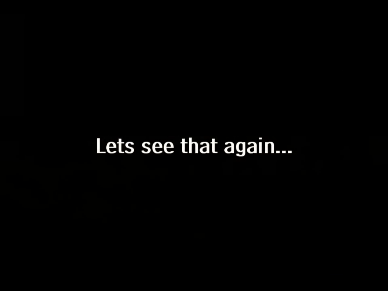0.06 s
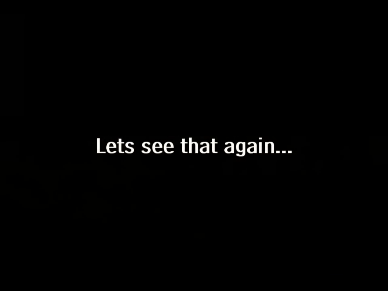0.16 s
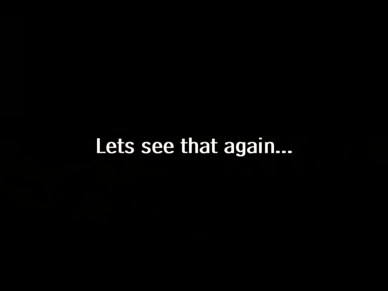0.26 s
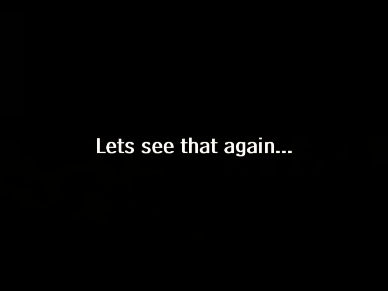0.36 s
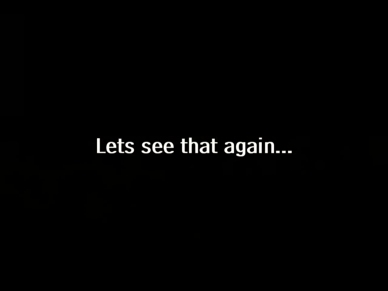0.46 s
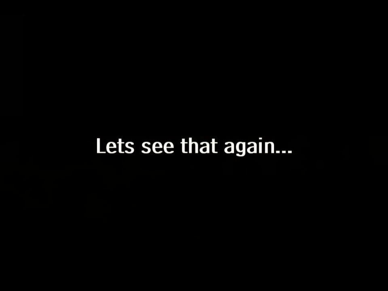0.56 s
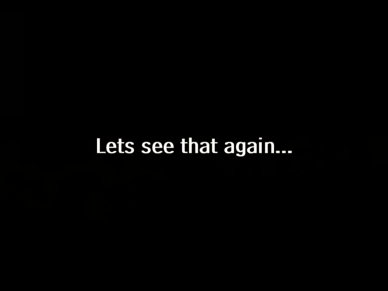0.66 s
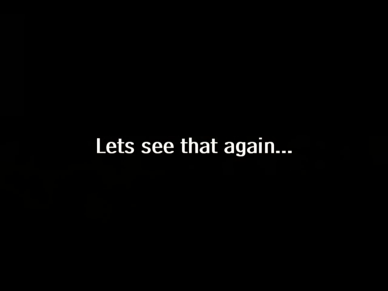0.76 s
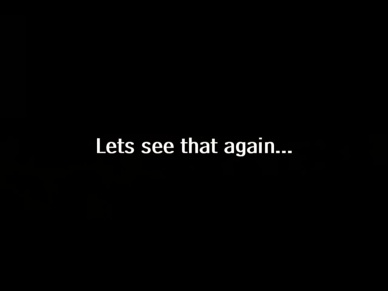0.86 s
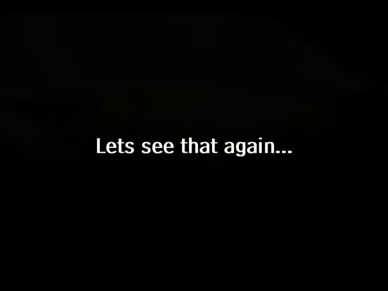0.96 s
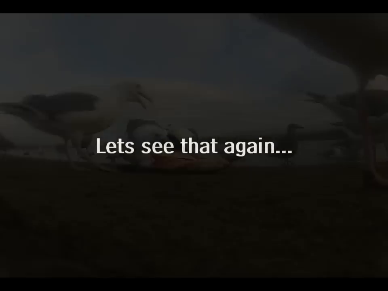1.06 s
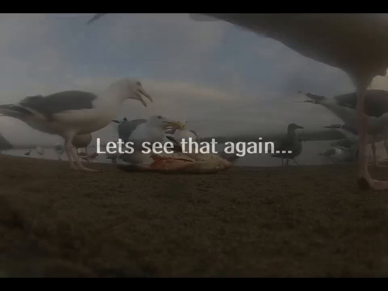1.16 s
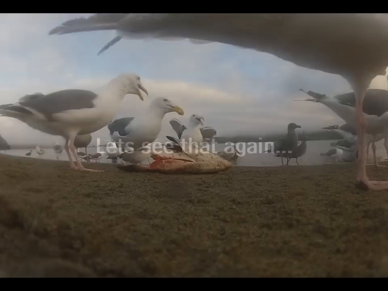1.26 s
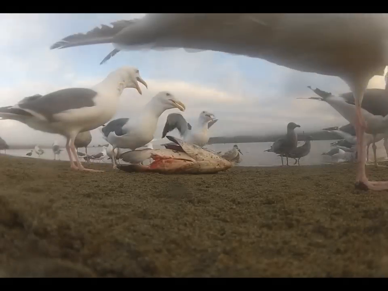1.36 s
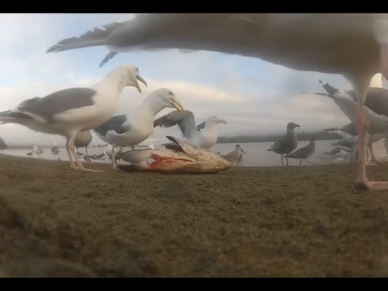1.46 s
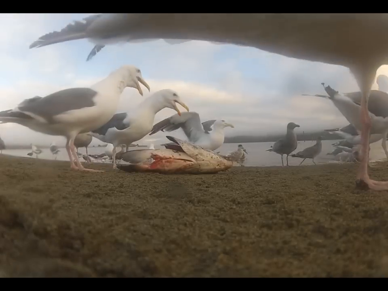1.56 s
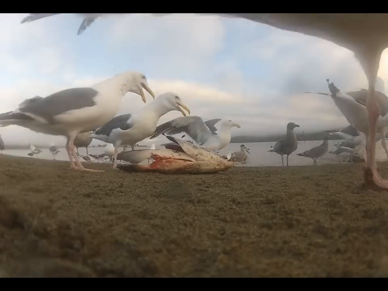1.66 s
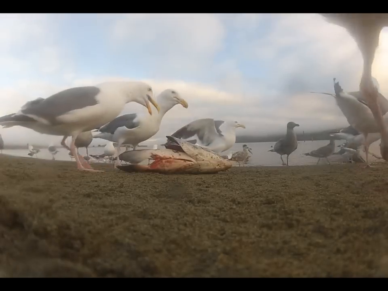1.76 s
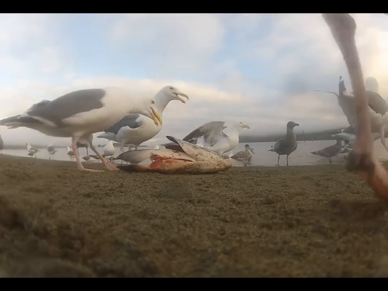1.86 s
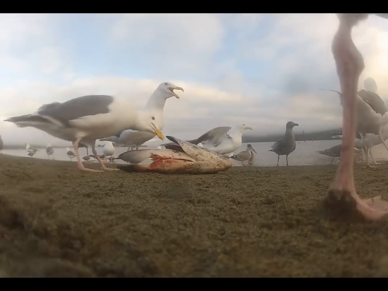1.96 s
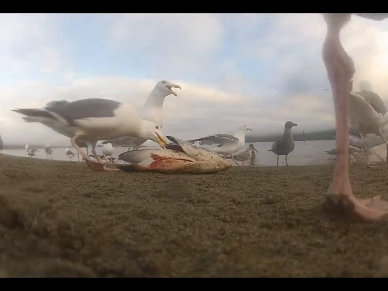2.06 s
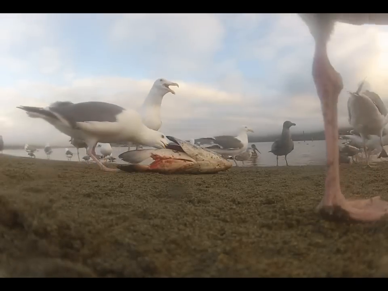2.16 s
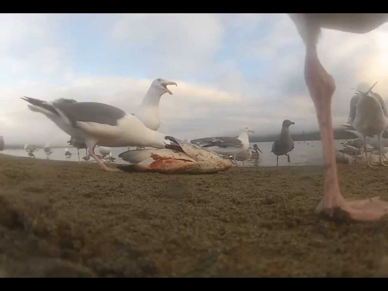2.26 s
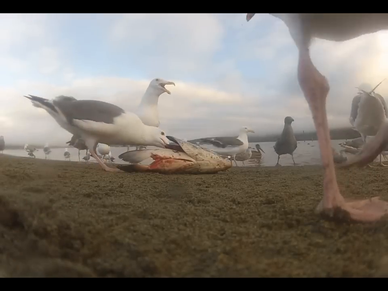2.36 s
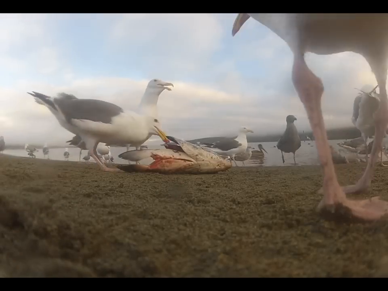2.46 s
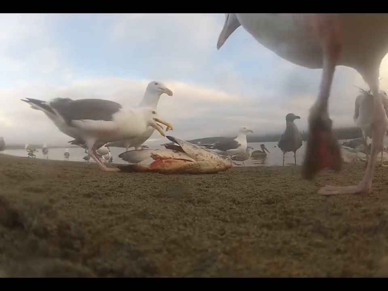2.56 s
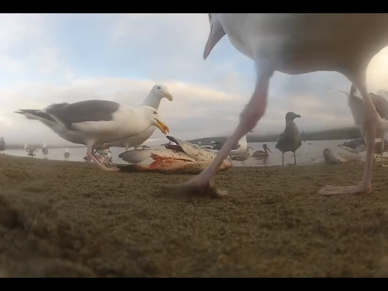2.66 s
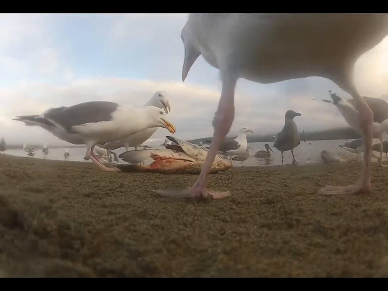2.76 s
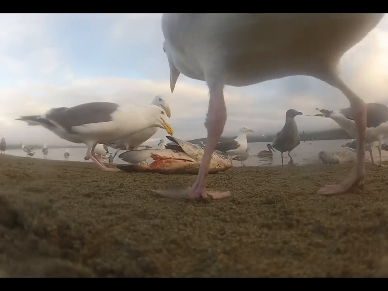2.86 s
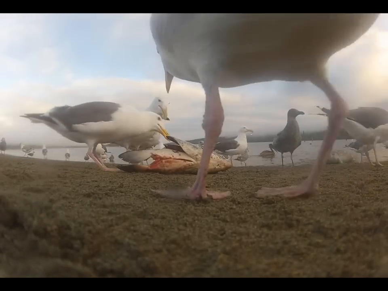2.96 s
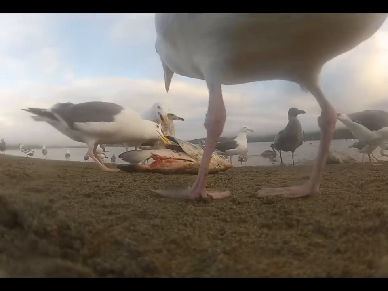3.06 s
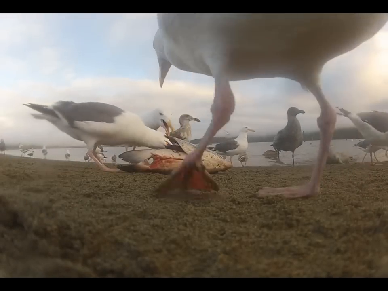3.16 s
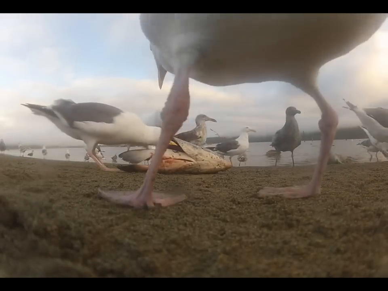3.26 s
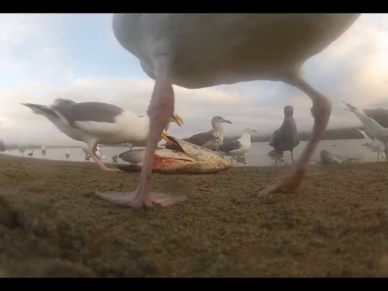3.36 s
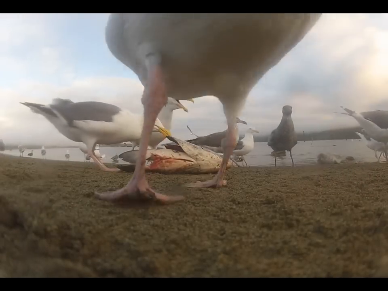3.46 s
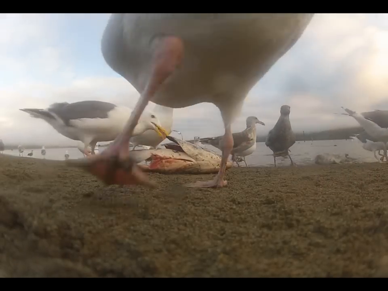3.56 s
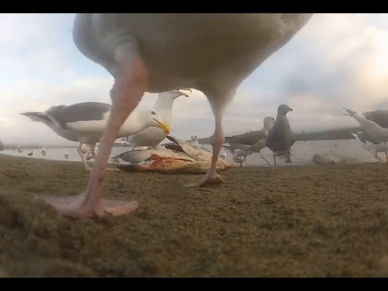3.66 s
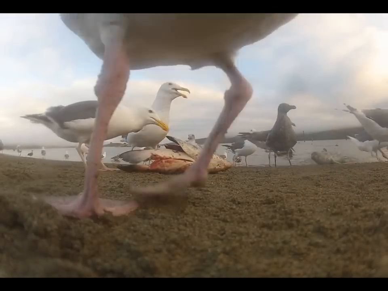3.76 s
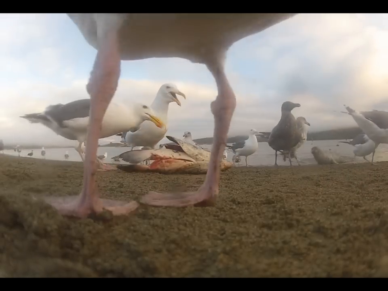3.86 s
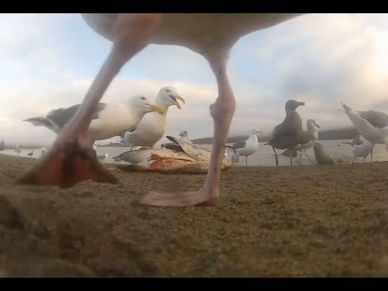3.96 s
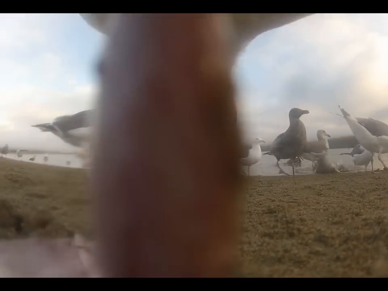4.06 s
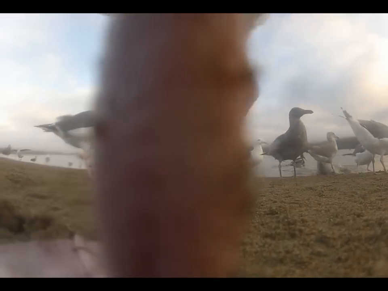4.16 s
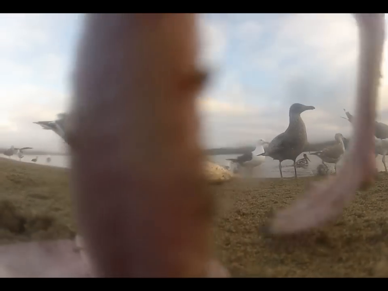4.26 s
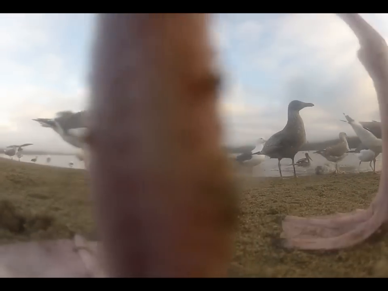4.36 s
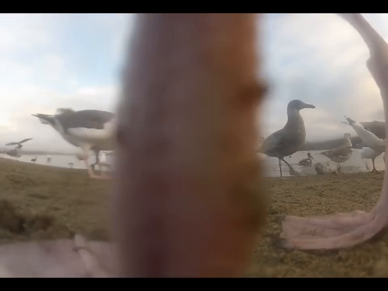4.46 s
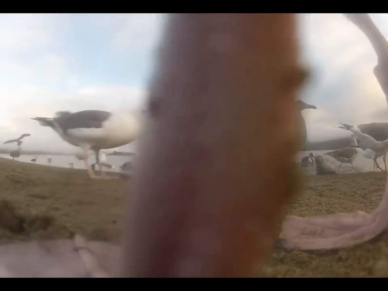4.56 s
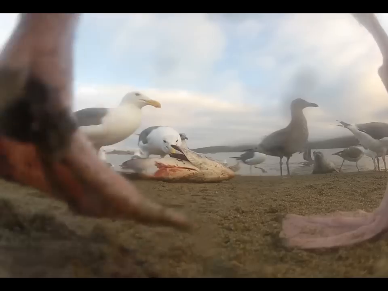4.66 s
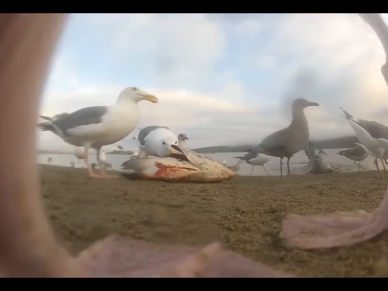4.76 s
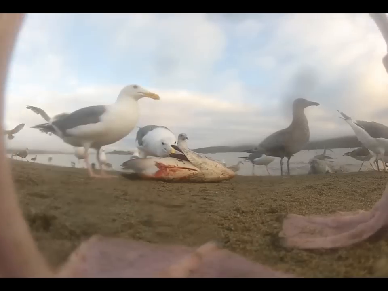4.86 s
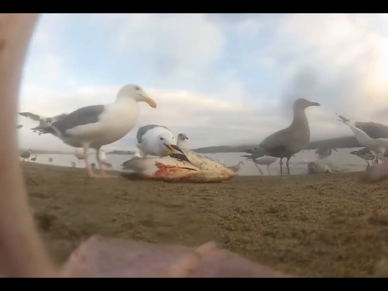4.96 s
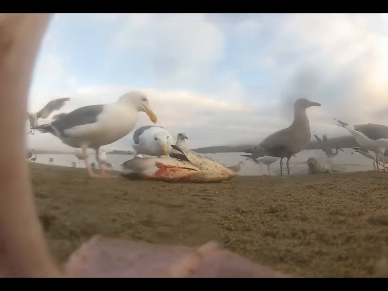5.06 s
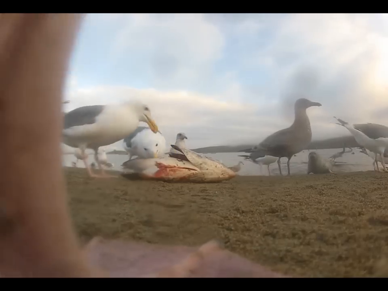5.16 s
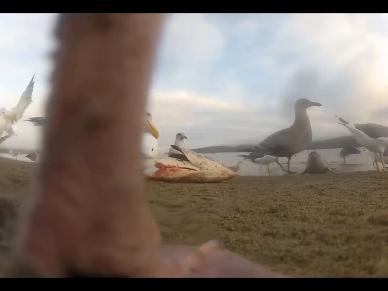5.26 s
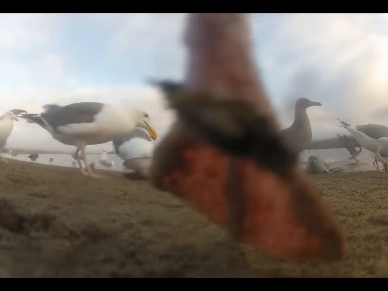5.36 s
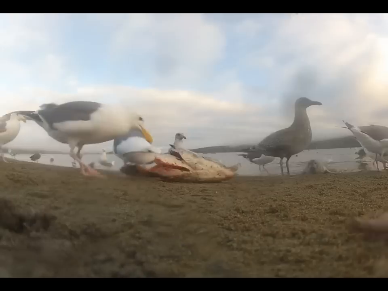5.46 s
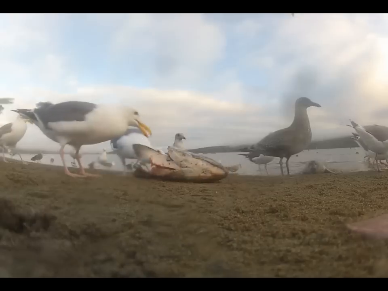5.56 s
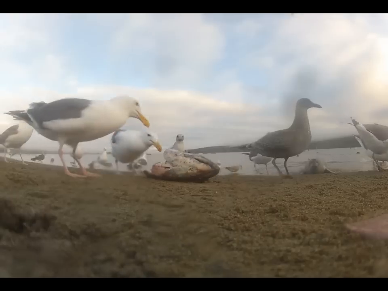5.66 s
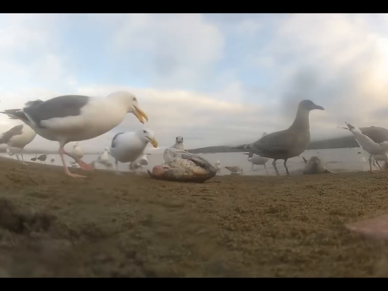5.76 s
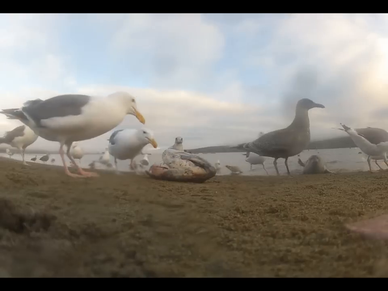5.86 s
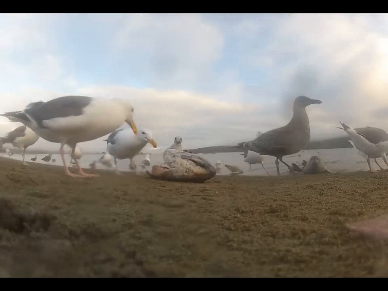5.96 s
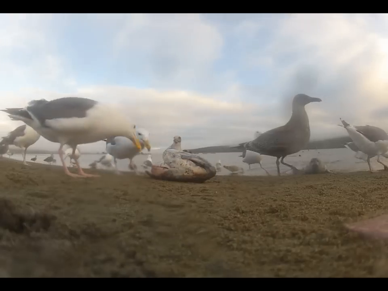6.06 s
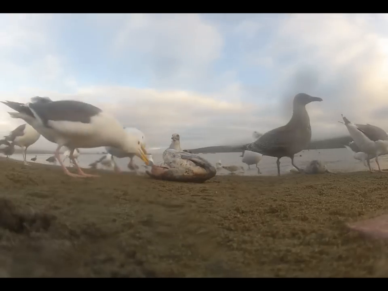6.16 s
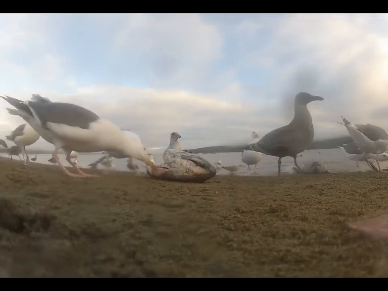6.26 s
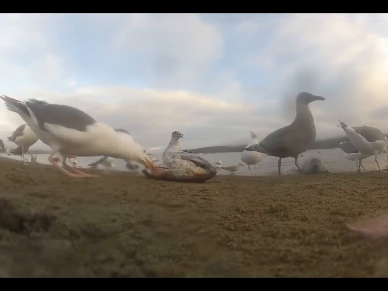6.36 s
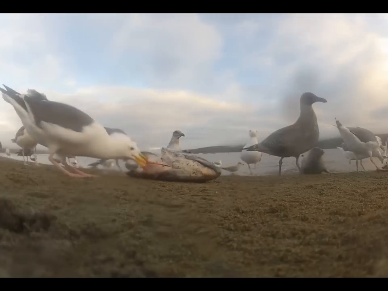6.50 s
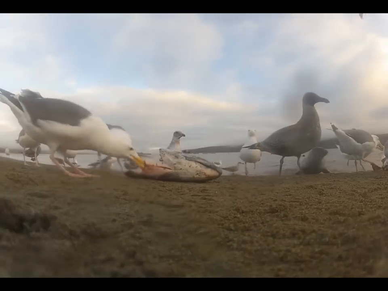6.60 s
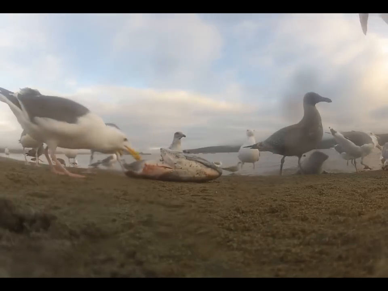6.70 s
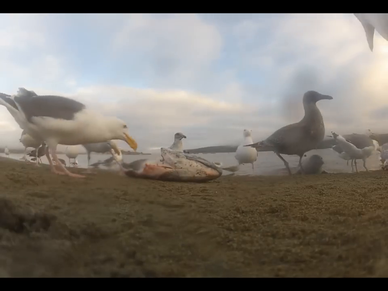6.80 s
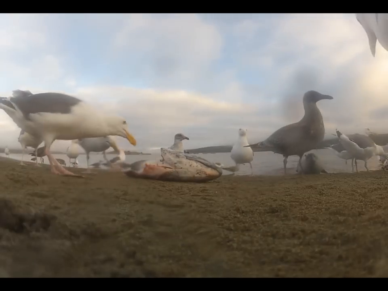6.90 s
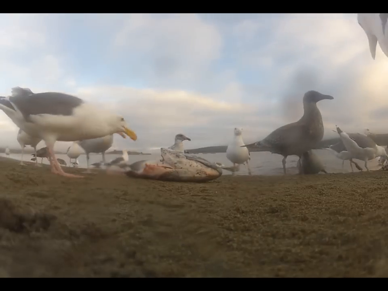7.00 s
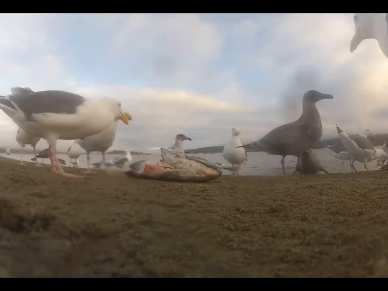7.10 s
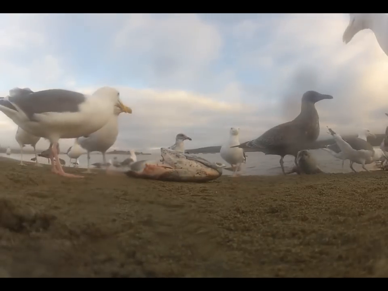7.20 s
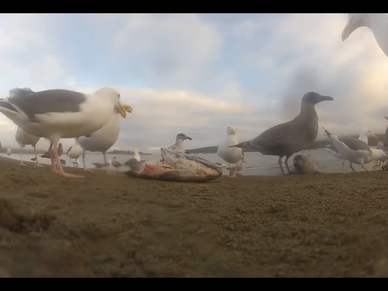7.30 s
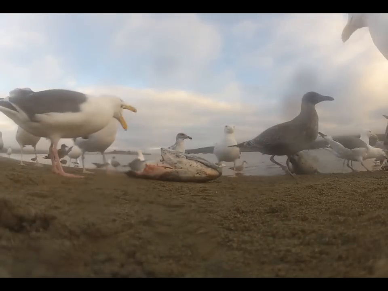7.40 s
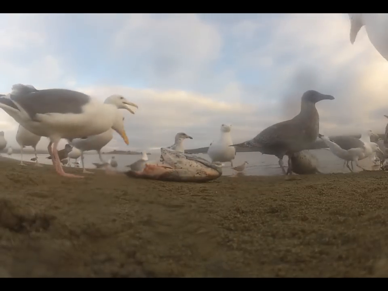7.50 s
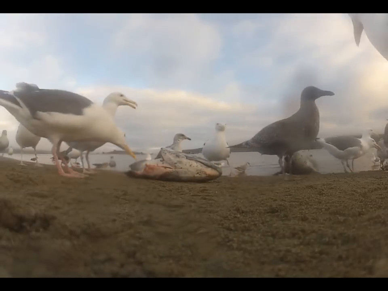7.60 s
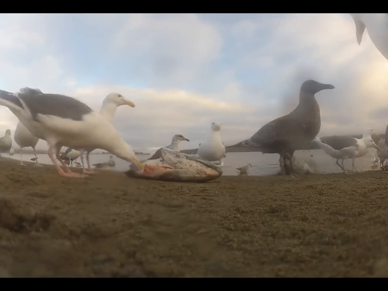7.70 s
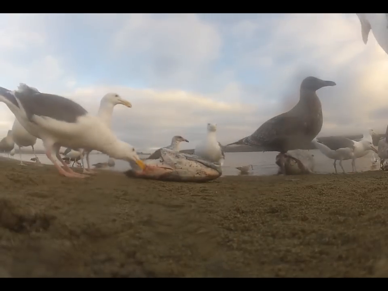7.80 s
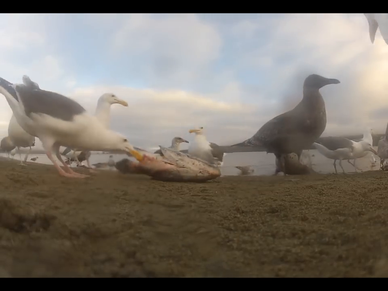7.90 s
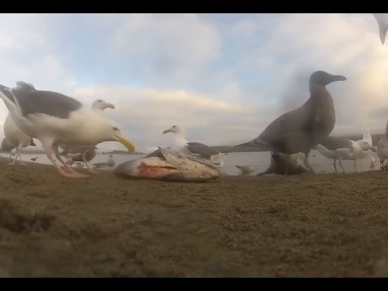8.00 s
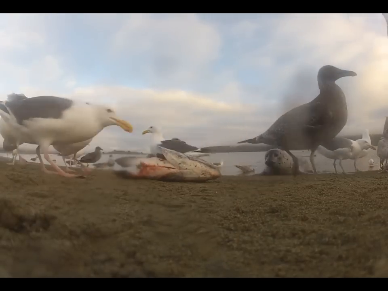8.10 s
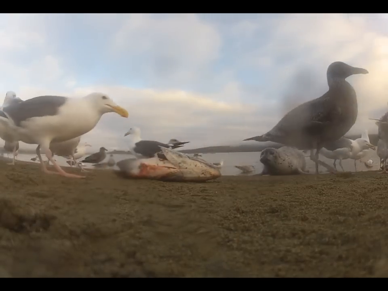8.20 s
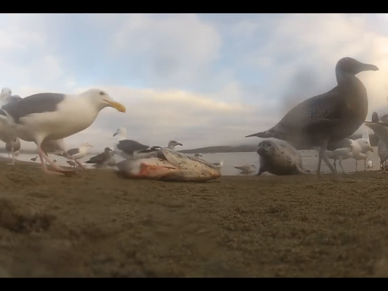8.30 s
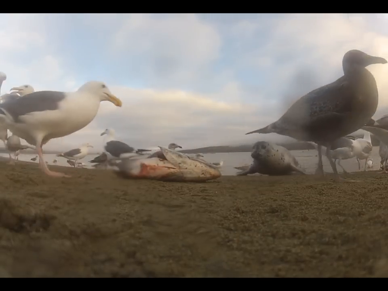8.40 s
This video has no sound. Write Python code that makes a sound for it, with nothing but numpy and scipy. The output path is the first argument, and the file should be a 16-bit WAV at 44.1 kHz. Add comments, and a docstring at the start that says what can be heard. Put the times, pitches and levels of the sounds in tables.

```python
"""Gulls squabble on a beach: adults cry arched notes, built from harmonics, that croak, break clear and rasp.
A young bird whistles in steps of near-sine tone, and one bird cackles in bursts of throat pulses.
A foot knocks, ticks and scrapes the plastic housing of a small camera on the sand; surf and wind are noise.
Slow playback holds every sample, which mirrors the sound around the sample rate."""
import sys
import numpy as np
from scipy import signal
from scipy.fft import rfft, irfft
from scipy.io import wavfile
from scipy.ndimage import uniform_filter1d

SR = 44100
rng = np.random.default_rng(int(sys.argv[2]) if len(sys.argv) > 2 else 0)


def store_pcm(level_fs):
    """Save levels as 16-bit WAV."""
    pcm = np.round(np.clip(level_fs, -1, 1) * 32767).astype(np.int16)
    wavfile.write(sys.argv[1], SR, np.atleast_2d(pcm).T)


def boost(x):
    """Linear amplitude factor 10**(x/20) for a level x in decibels (scalar or array-like)."""
    u = np.asarray(x, float) / 20
    return 10 ** u


N = 372204

# Arched cries of the adults. Each row: top of the arch in seconds, top pitch in Hz, rise in seconds,
# fall in seconds, fundamental in dB and second harmonic in dB, both before the voice shades them.
CRIES = [(0.0, 1500, .05, .062, -36, -36), (.08, 1343, 0.069, 0.059, -31.5, -28),
         (0.312, 1437, .13, 0.076, -35, -36), (0.397, 1326, 0.082, 0.054, -30, -32.5),
         (0.646, 1471, 0.12, 0.073, -32, -36), (0.732, 1335, 0.089, 0.041, -26.5, -25),
         (1.0, 1526, 0.11, 0.097, -30.5, -37.5), (1.046, 1320, 0.073, 0.076, -32, -26.5),
         (1.28, 1180, 0.098, 0.03, -30, -43), (1.312, 1449, 0.068, 0.054, -40, -27),
         (1.375, 1330, 0.12, 0.064, -34.5, -37), (1.386, 1473, 0.085, 0.061, -34, -25),
         (1.744, 1431, 0.12, 0.073, -26.5, -26), (2.031, 1276, 0.054, 0.048, -28, -28.5),
         (2.075, 1290, 0.1, 0.078, -34, -47), (2.35, 1232, 0.046, 0.042, -32, -36),
         (2.391, 1369, 0.094, 0.043, -29.5, -47), (2.781, 1238, .078, 0.059, -28.5, -34.5),
         (3.166, 1248, 0.075, 0.07, -31, -31.5), (3.535, 1258, 0.064, .062, -27, -26.5),
         (3.89, 1293, 0.07, 0.063, -30, -25.5), (4.24, 1196, .055, 0.047, -28.5, -33),
         (4.62, 1160, 0.1, 0.039, -32.5, -44), (4.985, 1246, 0.083, 0.041, -29.5, -40),
         (5.41, 836, .11, 0.1, -33, -44.5), (5.599, 1165, .06, .045, -34, -35.5),
         (6.235, 1050, 0.08, 0.046, -37, -45), (6.55, 1090, .045, 0.045, -42, -28.5),
         (6.637, 1397, 0.085, 0.051, -55, -39), (6.84, 1173, 0.028, 0.089, -38.5, -43),
         (6.97, 1420, 0.094, 0.071, -63, -34.5), (7.0, 1283, 0.028, 0.11, -38, -39.5),
         (7.31, 1262, 0.068, 0.048, -40, -26), (7.33, 1423, 0.086, 0.059, -57, -33),
         (7.54, 1070, 0.079, 0.057, -37, -35), (7.622, 1295, 0.078, 0.052, -36.5, -22.5),
         (7.685, 1413, .1, 0.064, -52, -33.5), (7.966, 1270, 0.084, 0.066, -37.5, -26),
         (8.05, 1404, 0.082, 0.059, -58, -34.5), (8.33, 1199, 0.082, 0.076, -34.5, -29),
         (8.44, 1090, .08, 0.054, -41, -36.5)]
# Resonances of hoarse voices. Each row: centre in Hz, width in Hz, gain in dB.
HOARSE_MODES = [(1104, 260, 11.5), (1810, 83, 16.5), (2606, 810, 10.5), (3700, 470, -12), (5200, 2900, -62)]
# Resonances of the plastic housing. Each row: centre in Hz, width in Hz, gain in dB.
HOUSING_MODES = [(1180, 620, -9), (1870, 240, 0.5), (2390, 330, -1.5), (3710, 310, -4), (5160, 1160, -17.5)]


def coloured(points):
    """Unit-rms noise with the given spectrum, as (Hz, dB) points."""
    hz, db = np.transpose(points)
    f = np.fft.rfftfreq(N, 1 / SR) + 1
    spectrum = rfft(rng.standard_normal(N)) * boost(np.interp(np.log(f), np.log(hz), db))
    x = irfft(spectrum, N)
    return x / x.std()


def ring(x, modes):
    """Sum of two-pole resonances, neighbours in opposite sign."""
    total = 0
    for k, (hz, width, db) in enumerate(modes):
        b, a = signal.iirpeak(hz, hz / width, SR)
        total = total + (-1) ** k * boost(db) * signal.lfilter(b, a, x)
    return total


def walk(rate):
    """Random levels, each held 1 / rate seconds, then smoothed into slopes; unit spread."""
    hold = int(SR / rate)
    steps = np.repeat(rng.standard_normal(N // hold + 1), hold)
    x = uniform_filter1d(steps, hold)[:N]
    return x / x.std()


def blips(rows, width_s):
    """One short bell-shaped bump per (seconds, dB) row, peaking one width after the given time."""
    t = np.arange(N) / SR
    return sum(boost(db) * np.exp(-.5 * ((t - s - width_s) / width_s) ** 2) for s, db in rows)


def span(start, length, fade_s):
    """Samples of an event, its progress (0-1 between the fades) and its edge fades."""
    i = np.arange(max(int((start - fade_s) * SR), 0), min(int((start + length + fade_s) * SR), N))
    t = i / SR - start
    fade = np.clip(np.minimum(t, length - t) / fade_s + 1, 0, 1) ** 2
    return i, t / length, fade


def adults():
    """Harmonic notes that croak, break clear and flare as they fall; each drives a rasp ahead of it."""
    # Chest resonance that shades the fundamental. Each row: frequency in Hz, gain in dB.
    chest = [(700, -19.5), (900, -17), (1130, -9.5), (1300, -9), (1480, -18), (1900, 6.5)]
    # Throat and beak, for harmonics above the second. Each row: frequency in Hz, gain in dB.
    throat = [(1500, 24.5), (2600, 7), (3300, 8), (4000, -7.5), (5200, -34), (6600, -23), (9000, -45)]
    croak_db, croak_waver = 4, .018  # the waver is a share of the pitch
    swell_db = 12.5  # gained by the fundamental per share of pitch lost in the fall
    flare_db, flare_at, flare_width = 11.5, 0.19, 0.11  # place and width are shares of pitch lost
    under_ratio, under_db = .8, -14  # pitch and level of the arch under the note

    out, effort = np.zeros(N), np.zeros(N)
    quiver, flutter_db = 1 + 0.0025 * walk(150), 1.18 * walk(70)
    rattle, waver = walk(500), walk(120)
    patchy_db = [3 * walk(45) for _ in range(7)]  # upper harmonics swell and break on their own
    for i, fade, hz, body_db, high_db, croak, drop in notes():
        chest_db = np.interp(hz, *np.transpose(chest))
        low = boost(body_db + chest_db + croak_db * croak + swell_db * drop)
        wavering_hz = hz * (quiver[i] + croak_waver * croak * waver[i])
        phase = 2 * np.pi * np.cumsum(wavering_hz) / SR
        rough = .1 + .55 * croak
        tone = low * np.sin(phase) * (1 + rough * rattle[i]) / np.sqrt(1 + rough ** 2)
        # the other side of the voice box sounds a hoarse weaker arch under the note
        under = low * boost(under_db + patchy_db[0][i]) * (1 + .5 * rattle[i])
        tone += under * np.sin(under_ratio * phase)

        second_db = np.interp(2 * hz, *np.transpose(throat))
        flare = flare_db * np.exp(-((drop - flare_at) / flare_width) ** 2)
        # thin voices with little fundamental are the shrillest
        shrill_db = -3 - 0.21 * (body_db + 47.5)
        for k in range(2, 7):
            shade_db = np.interp(k * hz, *np.transpose(throat)) - second_db
            if k > 2:
                shade_db = shade_db + patchy_db[k][i] + flare + shrill_db
            level = boost(high_db + shade_db - 11 * croak)
            tone += level * (1 + .2 * rattle[i]) * np.sin(k * phase)
        out[i] += tone * fade * boost(flutter_db[i])
        effort[i] += low * fade
    # the rasp follows the smoothed effort, moved 0.088 s earlier
    lead = np.roll(uniform_filter1d(effort, int(0.061 * SR)), -int(0.088 * SR))
    return out + boost(-25.0) * lead * rasp()


def notes():
    """Samples, fade, pitch, levels, croak 0-1 and fall (share of pitch) of every cry, yip and mew."""
    # Short flat yips. Each row: middle in seconds, pitch in Hz, second harmonic in dB at the middle.
    yips = [(2.69, 1355, -38), (2.993, 1313, -37), (3.3, 1330, -37), (3.616, 1340, -38.5),
            (3.945, 1333, -31.5), (5.279, 1433, -46.5)]
    # Long sagging mews. Each row: start in seconds, length in seconds, first pitch in Hz, last pitch in Hz,
    # fundamental in dB before the chest shades it, second harmonic in dB at the start.
    mews = [(2.415, 0.165, 1393, 1330, -43.5, -39), (2.556, 0.17, 1750, 1630, -56, -53),
            (3.862, 0.12, 1900, 1580, -32, -19)]
    # share of the pitch lost at the ends of an arch, and how late it bends
    rise_depth, rise_bend, fall_depth, fall_bend = 0.42, 2.1, 0.38, 2.2
    # dB that the upper harmonics lose per share of pitch lost
    rise_dull_db, fall_dull_db = 90, 60.5
    # the voice croaks until it climbs within the first share of its top pitch, then breaks clear;
    # the croak hangs no lower than the second share under the top pitch
    break_share, croak_depth = .12, .28

    for top, hz, rise, fall, body_db, high_db in CRIES:
        i, _, fade = span(top - rise, rise + fall, .015)
        t = i / SR - top
        climb = np.minimum(rise_depth * np.clip(-t / rise, 0, None) ** rise_bend, croak_depth)
        drop = np.minimum(fall_depth * np.clip(t / fall, 0, None) ** fall_bend, .6)
        croak = np.clip((climb - break_share) / 0.033 + .5, 0, 1)
        dulled_db = high_db - rise_dull_db * climb - fall_dull_db * drop
        yield i, fade, hz * (1 - climb - drop), body_db, dulled_db, croak, drop

    half_s = .03
    for middle, hz, high_db in yips:
        i, u, fade = span(middle - half_s, 2 * half_s, 0.0043)
        edge = (2 * u - 1) ** 2
        # almost no fundamental; pitch and treble sag a little at both ends
        yield i, fade, hz * (1 - .06 * edge), -78, high_db - 14 * edge, 0, 0

    for start, length, from_hz, to_hz, body_db, high_db in mews:
        i, u, fade = span(start, length, 0.017)
        yield i, fade, from_hz + (to_hz - from_hz) * u, body_db, high_db - 40 * u, 0, 0


def rasp():
    """Uneven slow throat pulses and breath noise through hoarse resonances, unit rms."""
    phase = np.cumsum(260 * (1 + 0.35 * walk(60))) / SR  # about 260 pulses a second
    source = rng.standard_normal(N) * (.5 + np.exp(-(phase % 1) / 0.25))
    x = ring(ring(source, HOARSE_MODES), [(1850, 7400, 0)])
    x = signal.sosfilt(signal.butter(3, 4300, fs=SR, output="sos"), x)
    return x / x.std()


def squawks():
    """Toneless bursts of throat rasp with a hiss on top."""
    # Squawks. Each row: start in seconds, length in seconds, level of the rasp in dB.
    bursts = [(0.023, 0.012, -39), (1.272, 0.07, -43.5), (3.8, .045, -64), (6.46, 0.1, -45),
              (6.79, .05, -47.5), (7.055, 0.062, -44), (7.17, 0.016, -48), (7.452, 0.057, -55)]
    # Resonance of the hiss. Each row: centre in Hz, width in Hz, gain in dB.
    hiss_modes = [(4900, 900, -24)]
    voice = rasp() + ring(rng.standard_normal(N), hiss_modes)
    out = np.zeros(N)
    for start, length, db in bursts:
        i, _, fade = span(start, length, 0.023)
        out[i] += boost(db) * fade * voice[i]
    return out


def whistles():
    """Near-sine tones that slide and fade: piping in register steps, and one high harmonic of a cry."""
    # Thin whistles, often climbing in register steps, and the high fourth harmonic of the adult cry at
    # 2.075 s. Each row: start in seconds, length in seconds, first pitch in Hz, last pitch in Hz,
    # level in dB at the end of the tone.
    thin_tones = [(.752, 0.13, 2850, 2770, -47.5), (1.106, 0.093, 4800, 4430, -56),
                  (1.448, 0.073, 3770, 3650, -52.5), (1.819, 0.049, 3830, 3710, -46),
                  (2.05, 0.076, 5130, 4780, -48.5), (2.194, 0.045, 2710, 2740, -47.5),
                  (2.26, 0.033, 2910, 3040, -46), (2.301, 0.024, 3580, 3800, -34.5),
                  (2.33, 0.048, 4470, 4340, -49.5), (2.382, .11, 4910, 4470, -51),
                  (2.498, 0.061, 3980, 3700, -43.5), (3.442, 0.061, 3280, 3520, -39),
                  (3.479, 0.026, 4050, 4340, -37), (3.508, .14, 4815, 4360, -41),
                  (3.658, 0.059, 3860, 3590, -39.5), (3.926, .07, 5200, 4600, -43),
                  (4.628, 0.034, 2750, 3430, -42), (4.66, 0.025, 3430, 3350, -54),
                  (4.74, 0.17, 4620, 4430, -53), (5.257, 0.13, 3130, 3050, -66),
                  (5.279, 0.141, 3970, 3780, -54.5), (5.688, 0.031, 2970, 3130, -42.5),
                  (5.724, 0.018, 3700, 3810, -37.5), (5.747, 0.11, 4680, 4240, -43.5),
                  (5.926, 0.058, 4010, 3790, -48.5), (6.304, 0.034, 2810, 3000, -48),
                  (6.352, 0.12, 3000, 2740, -48.5), (6.723, 0.042, 2900, 2980, -45),
                  (6.765, .025, 3600, 3720, -42.5), (6.77, 0.14, 3120, 3140, -62),
                  (6.791, .08, 4430, 4250, -56), (6.878, 0.044, 4810, 4600, -51),
                  (7.138, 0.29, 3250, 3150, -56), (7.685, 0.026, 3440, 3700, -39.5),
                  (7.71, 0.016, 4300, 4230, -49), (7.739, 0.16, 4880, 4550, -51),
                  (7.91, 0.074, 3940, 3720, -43.5)]
    tone_fade_db = 3.5  # each tone starts this much louder than it ends
    out, quiver = np.zeros(N), 1 + 0.0031 * walk(150)
    for start, length, from_hz, to_hz, db in thin_tones:
        i, u, fade = span(start, length, 0.0043)
        # the slide bulges upward by 1 % halfway
        hz = (from_hz + (to_hz - from_hz) * u) * (1 + .04 * u * (1 - u))
        phase = 2 * np.pi * np.cumsum(hz * quiver[i]) / SR
        out[i] += boost(db - tone_fade_db * (u - 1.0)) * fade * np.sin(phase)
    return out


def cackle():
    """Short bursts of throat pulses, mostly in one narrow resonance."""
    # Cackle syllables. Each row: onset in seconds, peak level in dB before the 7 dB cut below.
    syllables = [(5.7987, -35), (5.89, -37), (5.968, -33), (6.0487, -31.5), (6.132, -33), (6.294, -32),
                 (6.375, -37), (6.457, -41)]
    phase = np.cumsum(235 * (1 + 0.042 * walk(40))) / SR  # about 235 pulses a second
    pulses = np.diff(np.floor(phase), prepend=0) + 0.078 * rng.standard_normal(N)
    voice = ring(pulses, [(1750, 190, 12.0), (2690, 220, -25), (1050, 220, -31)])
    voice = ring(voice, [(1900, 2000, 0)])
    return blips(syllables, 0.0097) * voice / voice.std() * boost(-7.0)


def drags():
    """A foot dragged over the housing: gritty noise rings the plastic and the shell flexes with a rumble."""
    # Drags. Each row: start in seconds, length in seconds, grit in dB, rumble in dB.
    scrapes = [(3.988, 0.034, -18, -45), (4.035, 0.048, -26, -24), (4.105, 0.071, -30.5, -32.5),
               (4.179, .035, -47, -37), (4.254, .068, -35, -42), (4.335, 0.049, -46, -40),
               (4.473, .075, -46.5, -39), (4.567, 0.041, -35, -41), (4.673, 0.033, -26.5, -33.5),
               (4.723, 0.014, -19.5, -22.5), (4.751, 0.054, -45, -43.5), (5.213, 0.034, -42, -51)]
    # spiky grains whose level flickers
    grit = rng.standard_normal(N) * boost(2.3 * rng.exponential(size=N)) * boost(3 * walk(300))
    grit = ring(grit, HOUSING_MODES)
    grit = grit / grit.std()
    rumble = coloured([(15, -37.0), (45, 5), (110, -7), (300, -13.5), (800, -34.5), (9000, -78.0)])
    out = np.zeros(N)
    for start, length, grit_db, rumble_db in scrapes:
        i, _, fade = span(start, length, 0.016)
        out[i] += fade * (boost(grit_db) * grit[i] + boost(rumble_db) * rumble[i])
    return out


def claw_ticks():
    """Claws tick on the housing: very short clicks set its resonances ringing."""
    # Ticks. Each row: time in seconds, strength of the tap in dB before it rings the housing.
    taps = [(3.9823, -9.5), (4.0437, -18), (4.0574, -13), (4.1794, -28), (4.3086, -16.5), (4.4932, -21.5),
            (4.6708, -18.5), (4.6783, -26), (4.7047, -8.5), (4.7371, -2), (5.2036, -21), (5.217, -17),
            (5.2234, -19.5)]
    clicks = np.gradient(blips(taps, .00004))
    return ring(clicks, HOUSING_MODES) * boost(26)


def knock():
    """One hard knock sucks the diaphragm in, throws it out and leaves a low wobble."""
    t = np.arange(N) / SR - 3.9868  # seconds from the knock
    swing = 2.7 * t / 0.0011 * np.exp(-.5 * (t / 0.0012) ** 2) * np.where(t < 0, .57, 1)
    decay = np.exp(-np.maximum(t, 0) / 0.0068)
    wobble = -.3 * np.sin(2 * np.pi * 70 * np.maximum(t - .003, 0)) * decay
    return swing + wobble


def flock():
    """Many voices blur into a flickering rasp that surges with the cries; single far cries show through."""
    # Hoarse babble. Each row: time in seconds, level in dB while adults cry, drop between their cries in dB.
    babble = [(0.0, -54, 14.5), (.6, -47.5, 10.5), (1.2, -45.5, 9.5), (1.8, -43, 7.5), (2.4, -48.5, 6),
              (3.1, -45, 2), (3.6, -45.5, 9.5), (3.88, -38.5, 13), (4.0, -40, 21.5), (4.9, -47, 1),
              (5.5, -49.5, 0), (6.3, -43.5, 7.5), (6.55, -46, 9.5), (6.7, -58, -4.5), (7.2, -43.5, 9.5),
              (7.5, -50.5, 15), (8.0, -46.5, 9.5), (8.43, -50, 12.5)]
    crying = np.zeros(N)
    for top, _, rise, fall, *_ in CRIES:
        crying[max(int((top - rise) * SR), 0):int((top + .6 * fall) * SR)] = 1
    quiet = 1 - uniform_filter1d(crying, int(0.072 * SR))
    s, db, drop_db = np.transpose(babble)
    t = np.arange(N) / SR
    level_db = np.interp(t, s, db) - np.interp(t, s, drop_db) * quiet
    flicker = boost(2.5 * walk(25) - 2.5)
    return boost(level_db) * (flicker * rasp() + boost(.5) * far_cries())


def far_cries():
    """Faint random arches and slurs from birds down the beach, three harmonics each, unit rms."""
    out = np.zeros(N + SR)
    for when, length, pitch, bend, slide, size in rng.random((500, 6)):  # 500 cries
        u = np.linspace(-1, 1, int((0.0305 + .1 * length ** 2) * SR))
        hz = (700 + 800 * pitch) * (1 - .22 * bend * u ** 2 - 0.1998 * (slide - .35) * u)
        phase = 2 * np.pi * np.cumsum(hz) / SR
        cry = np.sin(phase) + boost(4.5) * np.sin(2 * phase) + boost(2.5) * np.sin(3 * phase)
        start = int(when * N)
        out[start:start + len(u)] += boost(14 * size) * (1 - u ** 2) * cry
    out = ring(out[:N] * (1 + .3 * walk(300)), HOARSE_MODES)
    return out / out.std()


def shore():
    """Surf and wind as slowly drifting noise, with dull footfalls and low bumps through the sand."""
    # Spectrum of surf and wind. Each row: frequency in Hz, level in dB per Hz before the overall level.
    surf = [(20, -11.5), (40, -6), (100, 0), (230, -2), (500, -7.5), (900, -13), (4000, -58), (7000, -35)]
    # Soft footfalls on sand. Each row: time in seconds, strength in dB before the resonance.
    footfalls = [(2.937, -42), (3.552, -39.5), (3.747, -42), (4.735, -23), (5.217, -42), (6.069, -43)]
    # Soft low bumps. Each row: onset in seconds, peak level in dB.
    thuds = [(1.469, -54.5), (2.019, -55), (2.759, -57), (3.464, -52), (5.214, -48), (5.636, -48),
             (6.337, -52), (7.939, -51.5), (8.099, -54)]
    steps = ring(blips(footfalls, 0.00015), [(380, 460, 15.0)])
    bump_hz = 95 + 8 * walk(8.8)
    bumps = blips(thuds, 0.03) * np.sin(2 * np.pi * np.cumsum(bump_hz) / SR)
    drift_db = -57 + walk(3.35)
    return boost(drift_db) * coloured(surf) + steps + bumps


def scene():
    """All sources at one microphone."""
    birds = adults() + squawks() + whistles() + cackle() + flock()
    foot = drags() + claw_ticks() + knock()
    return (birds + foot + shore())[None]


def low_pass(x):
    """Removes everything above the highest recorded frequency."""
    return signal.sosfilt(signal.butter(12, 16270, fs=SR, output="sos"), x)


def record(dry):
    """The input clips; slow playback keeps one sample in four and holds it, leaving mirrored treble."""
    hold = 4
    fine = signal.resample_poly(np.clip(dry, -1, 1), 160, 147, axis=1)  # to 48 kHz
    held = np.repeat(fine[:, ::hold], hold, axis=1)
    out = signal.resample_poly(held, 147, 160, axis=1)[:, :N]
    # the top octave is rounded off and cut
    out = signal.sosfiltfilt(signal.butter(1, 19000, fs=SR, output="sos"), out)
    out = signal.sosfiltfilt(signal.ellip(8, .1, 60, 15600, fs=SR, output="sos"), out)
    return low_pass(out)


dry = scene()
out = record(dry)
store_pcm(out)
```